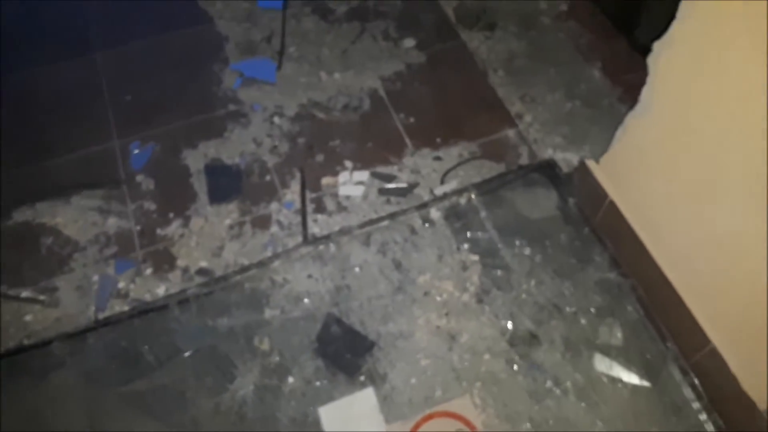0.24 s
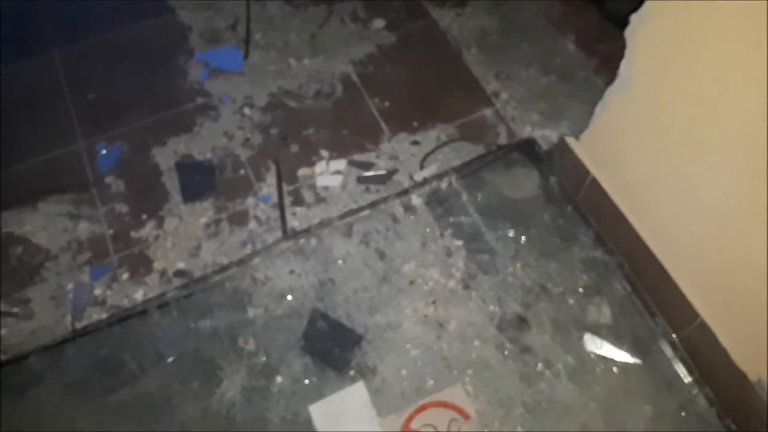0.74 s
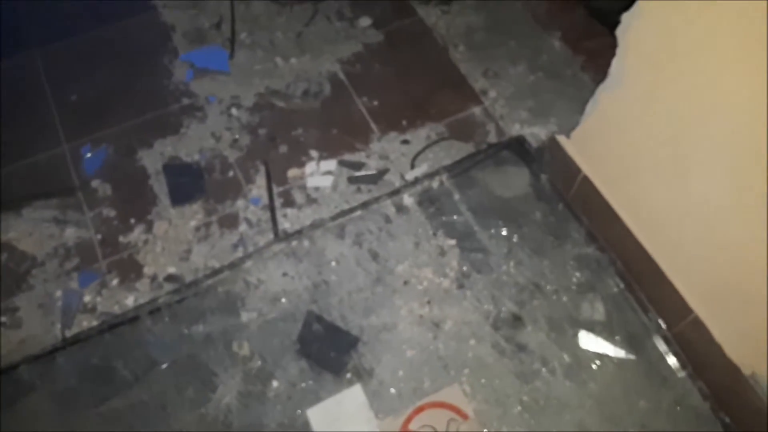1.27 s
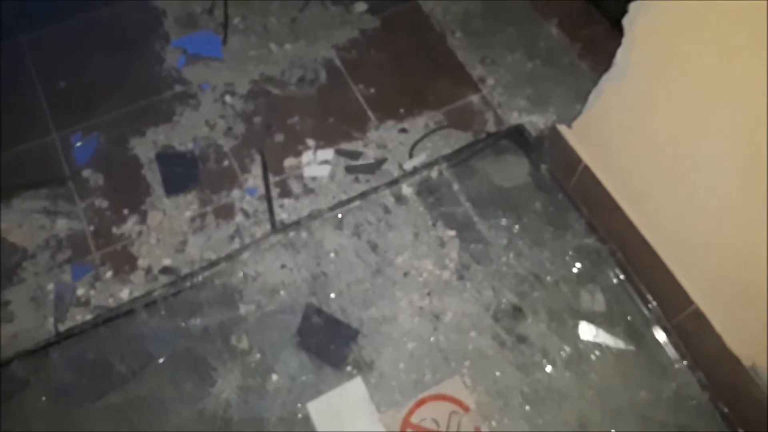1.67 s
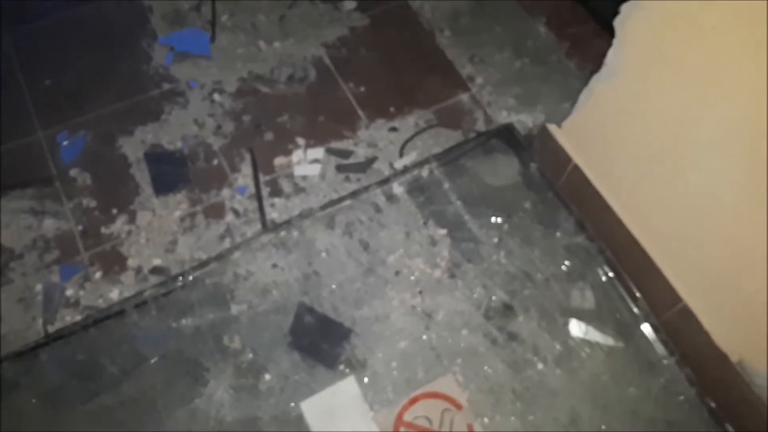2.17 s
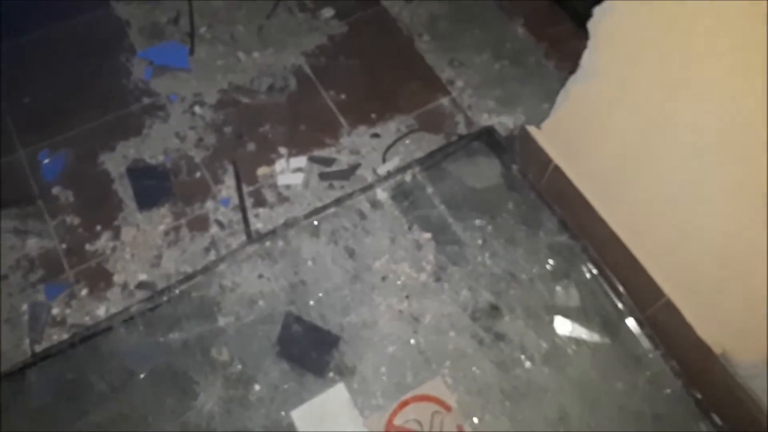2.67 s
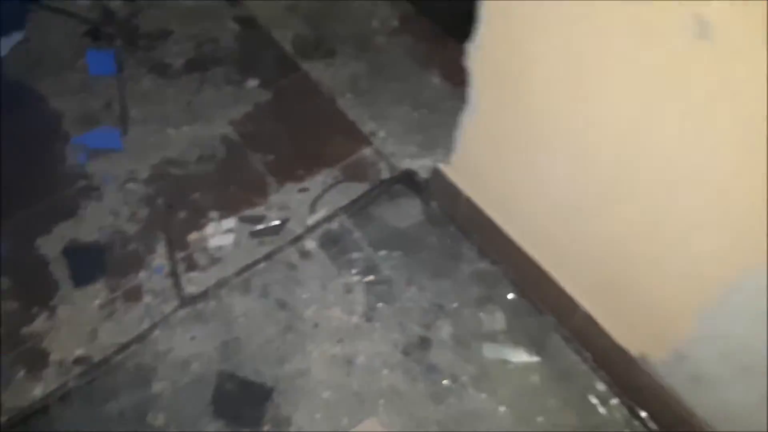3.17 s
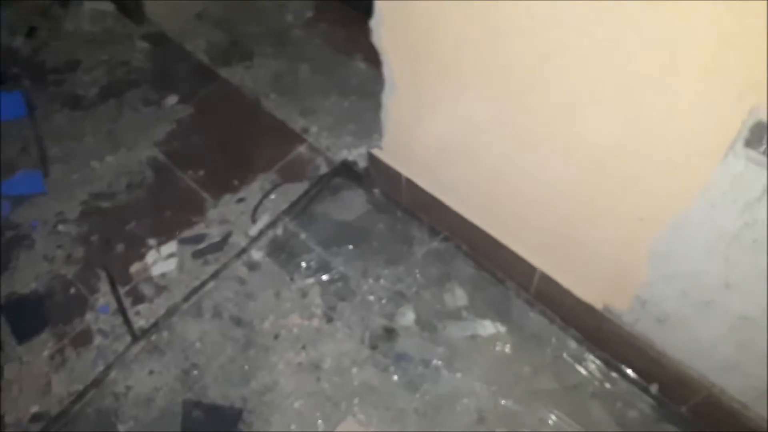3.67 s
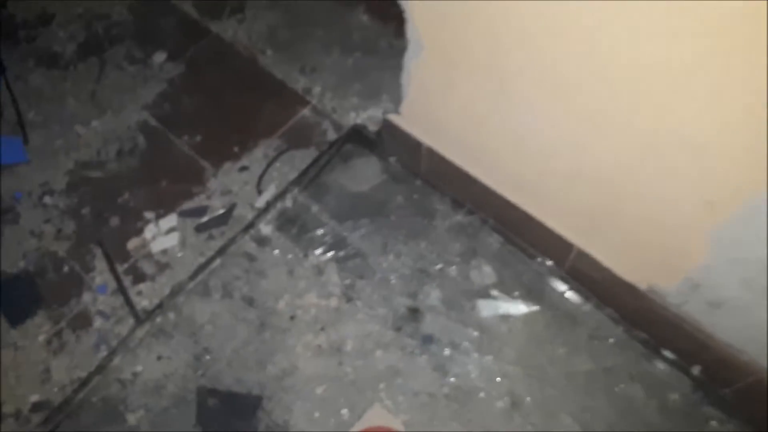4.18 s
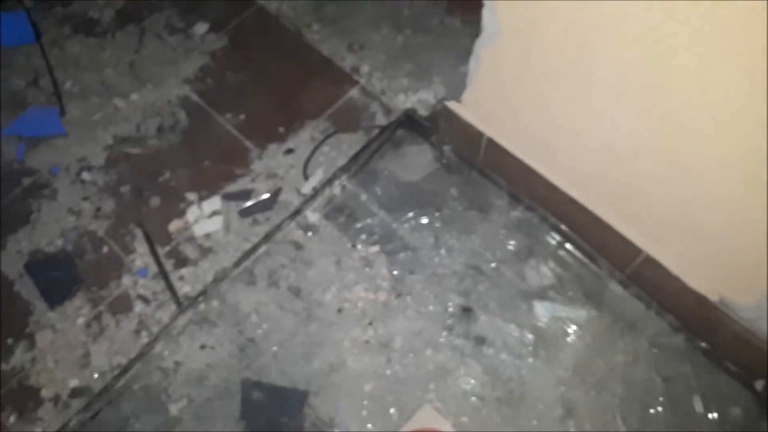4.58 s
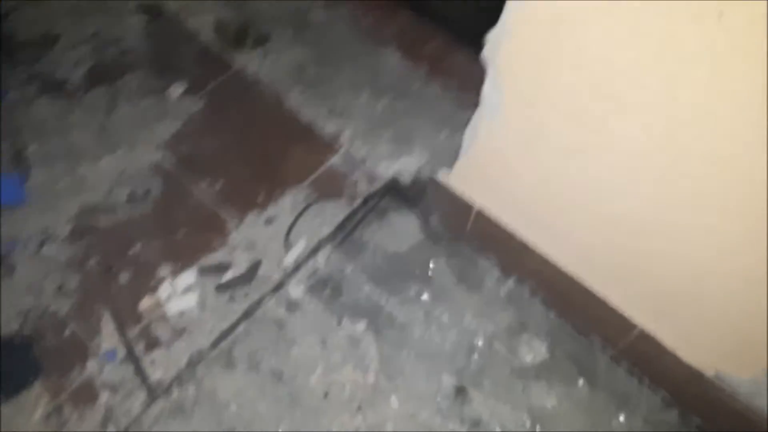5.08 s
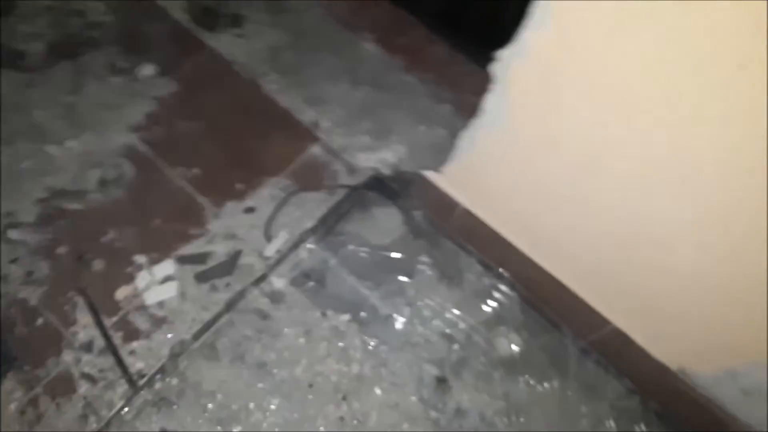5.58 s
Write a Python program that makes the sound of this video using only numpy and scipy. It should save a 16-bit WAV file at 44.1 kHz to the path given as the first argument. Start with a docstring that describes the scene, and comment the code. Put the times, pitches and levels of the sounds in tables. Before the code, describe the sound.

Someone steps carefully over glass and plaster debris; pieces crack, tiles thud, shards ring, with distant traffic and thrush-like birdsong.

```python
"""Slow footsteps on a tiled floor strewn with broken glass and plaster, in a bare, echoing room.
Pieces crack (noise bursts in bands), grit is scuffed and dragged (sparse clicks coloured by spectrum),
shards ring and loose tiles thud (resonators shaken by noise). Through the empty windows come far traffic
(shaped noise) and a thrush-like bird (gliding sines). Two small microphone ports, the right one peaky
near 2 kHz, add faint hiss."""
import sys
import numpy as np
from scipy import signal
from scipy.fft import rfft, irfft, next_fast_len
from scipy.io import wavfile

SR = 44100
rng = np.random.default_rng(int(sys.argv[2]) if len(sys.argv) > 2 else 0)


def master(y):
    """Save y as 16-bit WAV."""
    cut = np.clip(np.atleast_2d(y).T, -1, 1)
    pcm = np.round(cut * 32767)  # scale
    wavfile.write(sys.argv[1], SR, pcm.astype(np.int16))


N = 257544
TIME = np.arange(N) / SR

# spectrum of scuffed grit, also weighting its tonal grain: f/Hz, relative level/dB per Hz
RUSTLE_SPECTRUM = [(1470, -13), (2500, 1), (3380, -19), (3830, -7), (4980, -12.5), (5810, -13),
                   (7680, -8.5), (8760, -23.5), (11100, -15.5), (15900, -21.5)]


def amp(db):
    """Decibels to gain."""
    return 10 ** (np.asarray(db) / 20)


def rms_one(x):
    """Scale to unit rms."""
    return x / np.sqrt(np.mean(x ** 2) + 1e-20)


def peak_one(x):
    """Scale to unit peak."""
    return x / abs(x).max()


def at_hz(points, hz):
    """Read a table on a log-frequency axis."""
    points = np.array(points)
    return np.interp(np.log(hz + 1), np.log(points[:, 0]), points[:, 1])


def band(x, low_hz, high_hz):
    """Butterworth band-pass."""
    edges_hz = [low_hz, min(high_hz, SR / 2.2)]
    return signal.sosfilt(signal.butter(2, edges_hz, "band", fs=SR, output="sos"), x + 1e-18)


def coloured(x, gains):
    """Multiply the spectrum by gains(Hz)."""
    size = next_fast_len(x.shape[-1])
    hz = np.arange(size // 2 + 1) * SR / size
    return irfft(rfft(x, size) * gains(hz), size)[..., :x.shape[-1]]


def shaped(x, spectrum):
    """Colour by a spectrum table, silent outside its ends; unit rms."""
    low_hz, high_hz = spectrum[0][0], spectrum[-1][0]
    return rms_one(coloured(x, lambda hz: amp(at_hz(spectrum, hz)) * (hz >= low_hz) * (hz <= high_hz)))


def spread(mid, side):
    """Stereo pair: left and right share the bass and part ways in the treble."""
    # f/Hz, left-right likeness (0-1)
    likeness = [(30, 0.61), (50, 1), (100, 1), (300, 1), (700, 0.2), (1500, 0.57), (3000, 0.055),
                (5000, .02)]
    alike = lambda hz: np.clip(at_hz(likeness, hz), 0, 1)
    common = coloured(mid, lambda hz: np.sqrt((1 + alike(hz)) / 2))
    difference = coloured(side, lambda hz: np.sqrt((1 - alike(hz)) / 2))
    return common + difference * [[1], [-1]]


def ring(clicks, hz, t60_s):
    """Two-pole resonator: a unit click starts a decaying sine of height about 1."""
    r, w = amp(-60 / (t60_s * SR)), 2 * np.pi * hz / SR
    return signal.lfilter([0, np.sin(w)], [1, -2 * r * np.cos(w), r * r], clicks + 1e-18)


def rings(modes, rattle_ms, likeness=0.5):
    """Each row is one mode of one piece, shaken by a few ms of rattling contact."""
    out, t = np.zeros((2, N)), np.arange(SR // 4) / SR
    both, *own = rng.standard_normal((3, len(modes), len(t)))
    rattle = np.sqrt(likeness) * both + np.sqrt(1 - likeness) * np.array(own)
    shakes = (1 + rattle) * np.exp(-t * 1000 / rattle_ms)   # one-sided push plus rattle, dying together
    for (s, db, hz, t60_s), shake in zip(modes, shakes.swapaxes(0, 1)):
        tone = peak_one(ring(band(shake, hz / 2, hz * 2), hz, t60_s))
        out[:, round(s * SR):][:, :len(t)] += amp(db) * tone
    return out


def traffic():
    """Far traffic: bass rumble, engine drone and broad tyre roar, each noise with a slowly varying level."""
    # t/s, rumble level/dB, drone level/dB, roar level/dB
    swells = np.array([(0.0, -46, -50, -49), (0.35, -50, -53, -50), (0.67, -43, -50, -49.5),
                       (1.01, -50.5, -50.5, -48.5), (1.3, -45, -49.5, -47.5), (1.8, -47, -49, -46.5),
                       (2.1, -53, -51.5, -50), (2.55, -51, -54, -54), (2.95, -44, -49, -45),
                       (3.45, -46, -41.5, -43), (3.84, -46, -48.5, -44), (4.4, -46, -49.5, -49),
                       (4.75, -47, -50, -48), (5.5, -51, -51, -47.5), (5.84, -48.5, -51.5, -48.5)])
    # spectra: f/Hz, relative level/dB per Hz
    rumble_spectrum = [(15, -37), (25, -45), (43, -6.5), (86, -2), (118, 10), (151, -3.5), (200, -19.5),
                       (260, -31), (440, -120)]
    drone_spectrum = [(130, -6.5), (165, -2.5), (230, -6.5), (300, -7.5), (380, -17.5)]
    roar_spectrum = [(150, -7), (250, -9.5), (300, -18.5), (450, -6), (660, -4), (1340, -8), (2300, -10),
                     (2700, -17.5), (3200, -32), (4000, -43.5), (8000, -41.5), (10400, -66)]
    out = np.zeros((2, N))
    for k, spectrum in enumerate((rumble_spectrum, drone_spectrum, roar_spectrum), start=1):
        layer = shaped(spread(*rng.standard_normal((2, N))), spectrum)
        out += amp(np.interp(TIME, swells[:, 0], swells[:, k])) * layer
    return out


def microphone_hiss(level_db=-78):
    """Steady microphone noise, independent at the two ports."""
    # f/Hz, relative level/dB per Hz
    hiss_spectrum = [(2500, -9), (4000, -3.5), (7500, -7), (8500, -11.5), (12500, -2.5), (15900, -5.5)]
    return amp(level_db) * shaped(rng.standard_normal((2, N)), hiss_spectrum)


def grit(per_s, uneven_db):
    """Tiny fractures at random moments with uneven sizes, two draws spread to stereo."""
    sizes = amp(uneven_db * np.minimum(rng.exponential(1, (2, N)), 3)) * rng.standard_normal((2, N))
    return spread(*(sizes * (rng.random((2, N)) < per_s / SR)))


def tonal_grain(per_s=350, t60_s=0.035):
    """Chance knocks dealt to 30 short high resonances: a faintly tonal grain in the treble; unit rms."""
    knocks = (rng.random(N) < per_s / SR) * rng.standard_normal(N)
    pitches_hz, dealt = np.geomspace(3000, 13000, 30), rng.integers(0, 30, N)
    sides = rng.uniform(-1, 1, (30, 2, 1))   # left and right gains of each resonance
    out = np.zeros((2, N))
    for k, (hz, side) in enumerate(zip(pitches_hz, sides)):
        out += side * amp(at_hz(RUSTLE_SPECTRUM, hz)) * ring(knocks * (dealt == k), hz, t60_s)
    return rms_one(out)


def strokes(table, rise_db=20.5):
    """Gain of the strongest stroke at each moment: climb by rise_db, hold, fade."""
    db = np.full(N, -150.)
    for s, rise_s, hold_s, top_db, fade_db_per_s in table:
        before = rise_db * (s - TIME) / max(rise_s, 1e-3)
        after = fade_db_per_s * (TIME - s - hold_s)
        db = np.maximum(db, top_db - np.maximum(np.maximum(before, after), 0))
    return amp(db)


def grit_slips(per_s=60, decay_ms=18.5, height_db=3):
    """Grit gives way in sudden slips that die out, over a steady base; unit rms gain."""
    starts = (rng.random(N) < per_s / SR) * rng.random(N)
    dying = signal.lfilter([1], [1, -np.exp(-1000 / (decay_ms * SR))], starts)
    return rms_one(1 + amp(height_db) * dying)


def scuffs(grain_db=-8):
    """Fine grit rustles, coarse debris grinds; both follow the moving sole and come in slips."""
    # fine grit strokes: full level from t/s, rise/s, hold/s, level in 8.2-15.5 kHz/dB, fade/(dB/s)
    scuff_strokes = [(0.02, 0.086, .005, -60.5, 130), (0.146, 0.0065, 0.0045, -61, 341),
                     (0.422, .01, 0.0045, -66, 220), (0.515, .012, 0.066, -71, 295),
                     (0.59, 0.017, 0.033, -63, 250), (0.654, .01, 0.0031, -53.5, 600),
                     (0.68, .01, 0.015, -67, 101), (1.09, 0.2, 0.0085, -70.5, 250),
                     (1.29, 0.095, 0.13, -60.5, 450), (1.744, 0.01, 0.0077, -62.5, 172),
                     (1.835, 0.027, 0.0047, -43.5, 796), (1.87, .01, .01, -71, 125),
                     (2.715, .04, 0.0046, -55, 600), (2.76, 0.058, .08, -43.5, 116),
                     (2.945, 0.024, 0.0038, -40.5, 252), (3.05, .03, 0.2, -63.5, 203),
                     (3.245, 0.068, 0.036, -51.5, 148), (3.675, .03, 0.071, -60, 170),
                     (3.8, .02, 0.03, -74.5, 45), (4.339, .004, .015, -54.5, 329),
                     (4.3, .15, .03, -67.5, 200), (4.424, 0.023, .004, -62, 407),
                     (4.48, 0.018, 0.0044, -61, 277), (4.675, 0.066, .01, -74, 70),
                     (5.15, 0.56, 0.19, -76, 203), (5.338, .006, 0.013, -67.5, 23),
                     (5.474, 0.015, 0.086, -66, 200), (5.558, 0.042, .004, -53.5, 240),
                     (5.645, 0.072, 0.027, -55, 150)]
    # coarse debris strokes: full level from t/s, rise/s, hold/s, level/dB, fade/(dB/s)
    drag_strokes = [(1.274, 0.02, 0.076, -52, 500), (1.39, .02, 0.04, -58, 600),
                    (2.725, 0.0072, .06, -43, 300), (2.83, 0.096, .025, -32, 600),
                    (4.27, 0.088, 0.1, -44.5, 200), (4.355, .03, .005, -37.5, 500),
                    (4.38, .01, 0.1, -51, 500), (5.53, 0.13, 0.011, -45.5, 200),
                    (5.56, 0.028, 0.0034, -41, 400), (5.665, 0.048, 0.0044, -44, 250)]
    # f/Hz, relative level/dB per Hz
    grind_spectrum = [(88, -58), (150, -20.5), (269, 6), (406, -2), (544, 2), (1040, -1.5), (1280, -2.5),
                      (2440, -7), (5130, -35.5), (7140, -25), (9570, -39.5), (15900, -40)]
    rustle = shaped(grit(per_s=5000, uneven_db=1.0), RUSTLE_SPECTRUM) + amp(grain_db) * tonal_grain()
    rustle = rustle / np.std(band(rustle, 8200, 15500))
    grind = shaped(grit(per_s=1400, uneven_db=0.5), grind_spectrum)
    return grit_slips() * (strokes(scuff_strokes) * rustle + strokes(drag_strokes) * grind)


def cracks(crumble_ms=37.8, bits_per_s=2500, tick_db=-14, feet_lag_ms=0.3):
    """Each break is a burst of fractures in four bands, then the crushed piece crumbles on in bits."""
    # t/s, knock peak/dB, snap peak/dB, body peak/dB, crumble relative to burst/dB, pan L-R/dB
    breaks = [(0.0162, -29.5, -58, -38, -7, -0.5), (0.1471, -49, -42, -41, -28, -5),
              (0.4211, -39.5, -48, -44, -18.5, -5), (0.5176, -54, -50, -42, -10, -6),
              (0.595, -13, -15.5, -33, -18.5, -1.5), (0.651, -46, -40, -42, -14, -5),
              (0.776, -59, -48, -84, -17, -6), (1.3094, -32, -46, -47, -24, 1),
              (1.3929, -21, -33, -54, -28, 4.5), (1.412, -51, -43, -55, -16, 6),
              (1.7471, -21, -33, -35.5, -10.5, 0.5), (1.817, -5.5, -12, -21, -16, 3.5),
              (1.8369, -20, -34, -23, 4, -10), (2.106, -36.5, -66, -51, -6, 6),
              (2.6844, -30, -40, -52, -20, -3), (2.6995, -13.5, -22.5, -33.5, -11, 4.5),
              (2.7149, -18, -21, -32, -18, -1), (2.7545, -17.5, -21, -26, 5, 2.5),
              (2.7922, -20, -21, -33, -25, 3), (2.8413, -9.5, -20, -28.5, -12, 7),
              (2.9378, -3.5, -15, -15.5, -15, 6.5), (3.0173, -31, -44, -31, -29, 0),
              (3.1966, -35, -45, -32, -30, -13), (3.2469, -19, -33, -33, -11, 2),
              (4.339, -50, -33, -54, -22, 0), (4.348, -31, -44, -36, -15, 7),
              (4.357, -22.5, -34, -61, -20, 2), (4.4243, -60, -27.5, -68, -15.5, -2),
              (4.483, -23, -46, -34.5, -15, -2), (5.3403, -19.5, -30.5, -32, -18, -1),
              (5.4991, -37, -38, -44, -9, -6), (5.527, -25.5, -37, -42, 2, 4.5),
              (5.5583, -38, -34, -31, -10, -1), (5.6738, -23, -32, -53, -14, 5)]
    out, ms = np.zeros((2, N)), np.arange(SR // 7) * 1000 / SR
    for s, knock_db, snap_db, body_db, crumble_db, pan_db in breaks:
        bits = (rng.random(len(ms)) < bits_per_s / SR) * np.sqrt(SR / bits_per_s)
        crunch_ms = max(5.4 + 0.75 * knock_db, .5)   # weaker knocks are shorter
        shape = np.exp(-ms / crunch_ms) + amp(crumble_db) * bits * np.exp(-ms / crumble_ms)
        burst = rng.standard_normal((2, len(ms))) * np.minimum(ms / 0.23, 1) * shape
        burst[:, 8] += 4.7   # opening click
        snap = amp(snap_db) * peak_one(band(burst, 2760, 7000))   # the treble differs at the two ports
        tick = amp(snap_db + tick_db) * peak_one(band(burst, 6400, 15600))
        knock = amp(knock_db) * peak_one(band(band(burst[0], 800, 2500), 1050, 2570))
        body = amp(body_db) * peak_one(band(burst[1], 294, 630))
        shot = (snap + tick + knock) * amp([[pan_db / 2], [-pan_db / 2]])
        shot[1] = np.interp(ms - feet_lag_ms, ms, shot[1])   # right port hears it later
        out[:, round(s * SR):][:, :len(ms)] += shot + body
    return out


def loose_tiles():
    """Loose tiles thud under the weight: short low modes, mono."""
    # t/s, peak before mono pick/dB, f/Hz, t60/s
    thuds = [(.033, -31, 306, 0.083), (1.749, -30, 435, 0.024), (1.82, -14.5, 363.7, 0.11),
             (1.821, -22, 242, 0.076), (1.836, -22.5, 390, 0.18), (2.757, -30, 554, 0.13),
             (2.941, -20.5, 251.6, 0.14), (2.945, -14, 460, 0.056), (2.947, -18, 377, 0.034),
             (3.247, -39.5, 250, 0.105), (4.262, -31, 324, 0.048), (4.285, -32, 253.3, 0.12),
             (4.32, -37, 220, 0.074), (4.484, -33.5, 327, 0.047), (5.342, -31, 371, 0.053),
             (5.556, -30, 576, 0.089), (5.56, -43, 387, 0.041)]
    return rings(thuds, rattle_ms=1.5)[0]


def whistle(note, partials, throb_hz=52.2, swell_db=12.5, fade_db=7.5):
    """One note: pitch bends through three points, level swells to its loudest point and fades."""
    _, length_s, first_hz, middle_hz, last_hz, db, loudest, depth = note
    t = np.arange(round(length_s * SR)) / SR
    u, loudest = t / length_s, np.clip(loudest, .05, .95)
    hz = first_hz * (2 * u - 1) * (u - 1) + middle_hz * 4 * u * (1 - u) + last_hz * u * (2 * u - 1)
    phase = 2 * np.pi * np.cumsum(hz) / SR
    level_db = db - np.maximum(swell_db * (1 - u / loudest), fade_db * (u - loudest) / (1 - loudest))
    edge = np.clip(np.minimum(t, length_s - t) / .005, 0, 1)
    throb = 1 + np.clip(depth, 0, 1) * np.sin(2 * np.pi * throb_hz * t)
    tone = sum(amp(partial_db) * np.sin(k * phase) for k, partial_db in partials)
    return edge * throb * np.sqrt(2) * amp(level_db) * tone


def bird():
    """Thrush-like song: near-pure whistles, some throbbing, and one buzz of high harmonics."""
    # t/s, length/s, first f/Hz, middle f/Hz, last f/Hz, level before throb/dB, loudest at (0-1), throb (0-1)
    notes = [(0.43, 0.072, 1827, 2140, 2290, -40, 0.3, .2),
             (0.496, 0.091, 2263, 2355, 2300, -42, 0.44, .05),
             (0.584, 0.052, 2345, 2234, 1980, -41, .65, .3), (0.738, 0.051, 2192, 2200, 1820, -34, 0.9, .2),
             (0.795, 0.026, 1880, 2034, 2290, -33, 0.6, 0.1), (0.825, 0.024, 2243, 2140, 2130, -36, 1, 0.3),
             (0.847, 0.043, 2250, 2380, 2290, -44, 0.44, 0),
             (0.883, 0.016, 2260, 2330, 2400, -48, 0.8, 0.6), (1.04, 0.051, 7750, 7550, 7000, -67, 0.5, .4),
             (1.323, 0.028, 5850, 5570, 5600, -60, .4, .3), (1.35, 0.028, 5400, 5270, 5300, -61, 0.6, .3),
             (1.158, 0.065, 6950, 7340, 7600, -51, 0.2, 0.5), (1.53, .17, 1920, 2380, 2850, -60, .3, .8),
             (2.222, 0.058, 7760, 6920, 6480, -60.5, 0.3, 0.1),
             (4.371, 0.079, 2006, 2020, 2090, -42.5, .5, .05),
             (4.45, 0.116, 2130, 2126, 2082, -43, 0.6, 0.2),
             (4.365, 0.059, 3200, 3255, 3230, -48.5, .55, .2),
             (4.666, 0.034, 2930, 2860, 2800, -41.5, .6, 0.6),
             (4.685, 0.029, 2774, 2460, 2530, -31.5, 0.38, 0.2),
             (4.725, 0.026, 2346, 2475, 2640, -32.5, 0.6, 0.2),
             (4.765, 0.027, 2510, 2450, 2570, -58, .5, 0.5),
             (5.093, 0.03, 2570, 2643, 2560, -39, 0.9, 0.55),
             (5.105, 0.051, 2593, 2238, 1970, -35, 0.68, 0.7),
             (5.151, 0.033, 2010, 2234, 2480, -40.5, 0.44, 0.6),
             (5.171, 0.039, 2504, 2516, 2515, -33, .35, 0.24),
             (5.295, 0.048, 6300, 6380, 6600, -47.5, 0.05, 0.1),
             (5.716, 0.039, 6880, 6980, 7010, -58, .8, .3), (5.763, .035, 7130, 7200, 7180, -52.5, .1, 0.1),
             (5.745, 0.059, 5400, 5420, 5430, -62, .35, .2), (5.736, 0.035, 6550, 6800, 6750, -50, .4, 0.1)]
    # one buzzy note, harmonics of a fast pulse: same columns, f of the pulse, level of a 0 dB harmonic
    buzz = (.958, .112, 461, 455, 434, -51, .5, .25)
    # harmonic number, level/dB
    buzz_harmonics = [(6, -5), (7, 0), (8, -5), (12, -20), (13, -16), (14, -20)]
    out = np.zeros(N)
    for note, partials in [(note, [(1, 0)]) for note in notes] + [(buzz, buzz_harmonics)]:
        sound = whistle(note, partials)
        out[round(note[0] * SR):][:len(sound)] += sound
    return out


def echo_flutter(depth=0.95):
    """Gain wavering at random, 15-113 Hz, to roughen the echoed song."""
    return 1 + depth * rms_one(band(rng.standard_normal(N), 15, 113))


def from_window(pair, lag_ms=0.39):
    """Outdoor sound reaches the right port later."""
    return np.array([pair[0], np.roll(pair[1], round(lag_ms * SR / 1000))])


def glass_shards():
    """Glass shards set ringing: high modes shaken by the rattling contact."""
    # t/s, peak/dB, f/Hz, t60/s
    pings = [(1.822, -12.5, 1220, 0.055), (1.824, -14.5, 1296, 0.13), (1.821, -21, 1625, 0.048),
             (1.82, -15, 2225, 0.023), (1.836, -27, 5080, 0.028), (2.792, -25.5, 4340, 0.14),
             (2.821, -22.5, 1595, 0.09), (2.84, -22, 6000, 0.038), (2.841, -36, 6950, 0.048),
             (2.846, -19.5, 1127, 0.067), (2.849, -11.5, 1790, 0.2), (2.85, -24, 1750, 0.18),
             (2.853, -32, 1420, 0.06), (2.857, -30.5, 4140, 0.05), (2.939, -19.5, 5990, 0.05),
             (2.943, -20.5, 4020, 0.039), (2.94, -20, 2320, 0.035), (2.941, -21.5, 1746, 0.11),
             (3.249, -24.5, 2260, 0.01)]
    return rings(pings, rattle_ms=5.0)


def room(x, build_ms=0.67):
    """Dense echoes off bare walls: noise that dies band by band, the bass alike on both sides."""
    # f/Hz, t60/s
    decay = [(150, 0.84), (400, 0.55), (1500, 0.61), (4000, 0.51), (10000, 0.19)]
    t, edges_hz = np.arange(SR * 3 // 4) / SR, 80 * 2. ** np.arange(0, 8.1, .5)
    noise = spread(*rng.standard_normal((2, len(t))))
    tail = np.zeros((2, len(t)))
    for low_hz, high_hz in zip(edges_hz, edges_hz[1:]):
        if low_hz < SR / 2.5:
            t60_s = at_hz(decay, np.sqrt(low_hz * high_hz))
            tail += band(noise, low_hz, high_hz) * amp(-60 * t / t60_s)
    tail = tail * (1 - np.exp(-t * 1000 / build_ms))
    tail = tail / np.sqrt(np.sum(tail ** 2) / 2)
    return signal.fftconvolve(x[None], tail, axes=1)[:, :N]


def scene():
    """Feet close by, the outdoors reaching the left port first, feet and song echoing in the room."""
    feet, tiles, song, shards = scuffs() + cracks(), loose_tiles(), bird(), glass_shards()
    to_room = amp(-8.5) * feet.mean(axis=0) + amp(-21) * shards[0] + amp(-9) * tiles
    to_room = to_room + amp(-9.5) * song * echo_flutter()
    outdoors = from_window(traffic() + song)
    return feet + shards + tiles + room(to_room) + outdoors + microphone_hiss()


def record(dry):
    """The two ports share the sound's power unevenly by frequency; the top is cut by 16.6 kHz."""
    # f/Hz, L-R level/dB
    port_balance = [(60, -0.5), (600, 0), (1000, -3.5), (1400, -7.5), (1900, -14.5), (2400, -9),
                    (3100, -3.5), (4000, 1), (7000, -2), (15000, -0.5)]
    left = lambda hz: np.sqrt(2 / (1 + amp(-2 * at_hz(port_balance, hz))))
    right = lambda hz: np.sqrt(2 - left(hz) ** 2)
    ports = [coloured(dry[0], left), coloured(dry[1], right)]
    return signal.sosfilt(signal.cheby2(14, 60, 16600, fs=SR, output="sos"), ports)


dry = scene()
out = record(dry)
master(out)
```